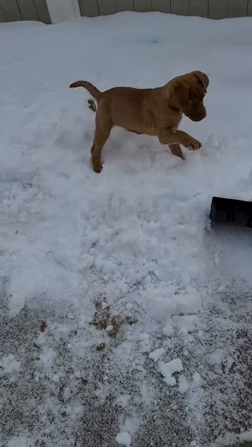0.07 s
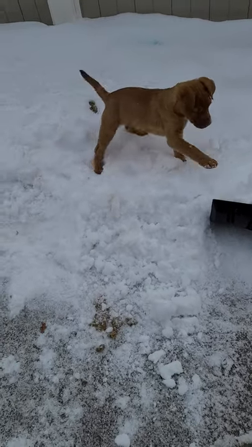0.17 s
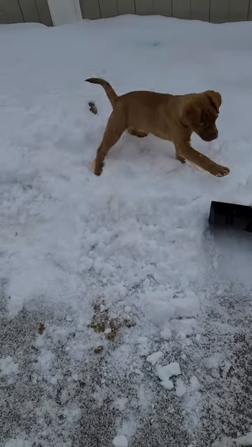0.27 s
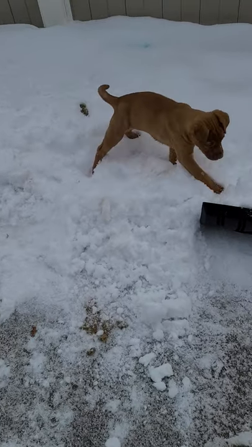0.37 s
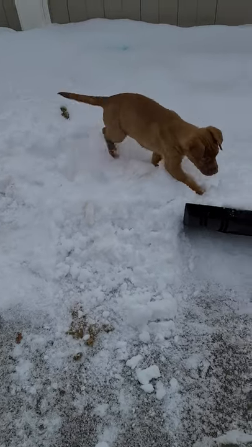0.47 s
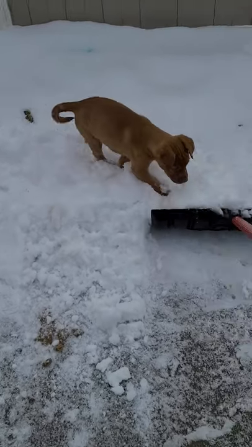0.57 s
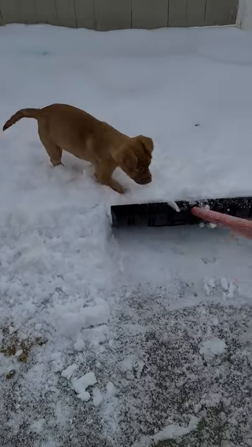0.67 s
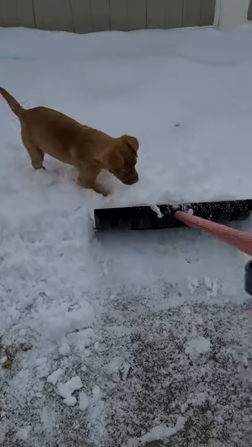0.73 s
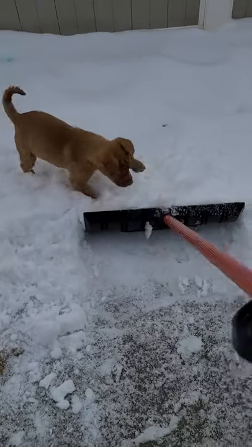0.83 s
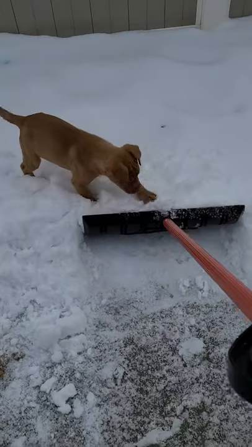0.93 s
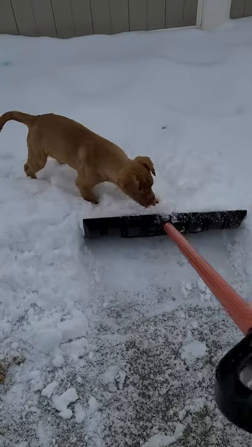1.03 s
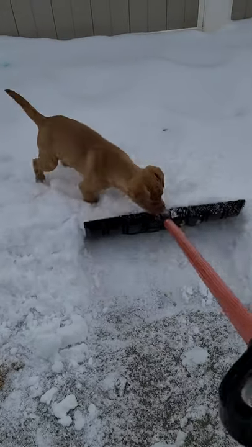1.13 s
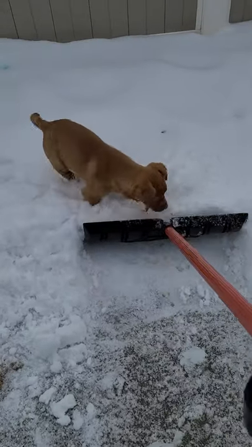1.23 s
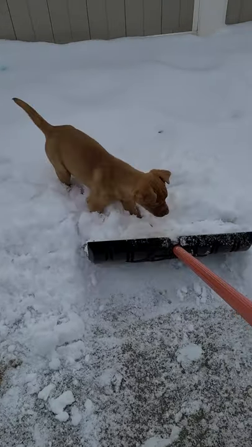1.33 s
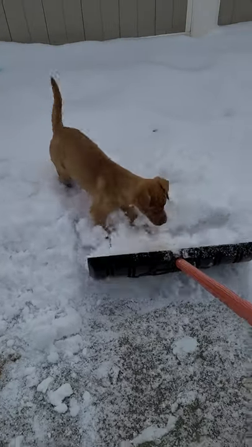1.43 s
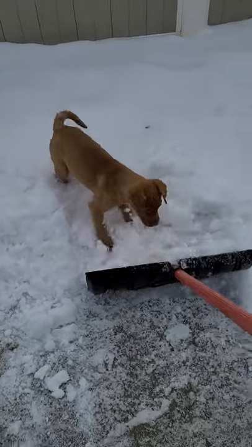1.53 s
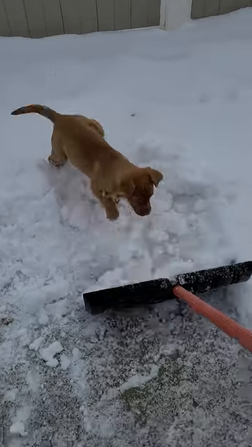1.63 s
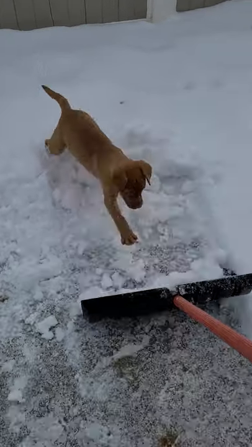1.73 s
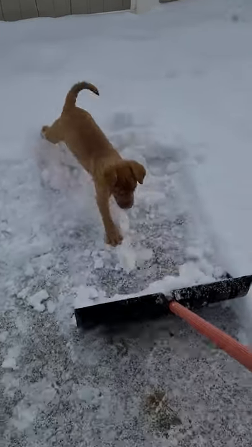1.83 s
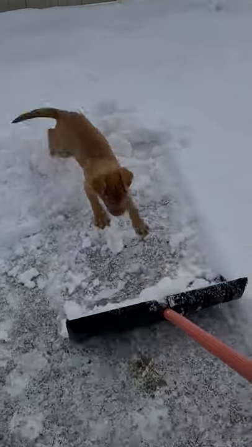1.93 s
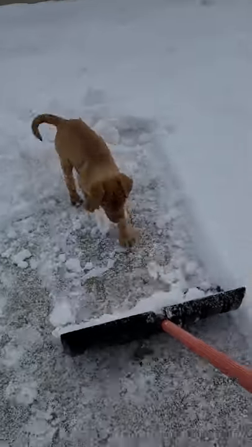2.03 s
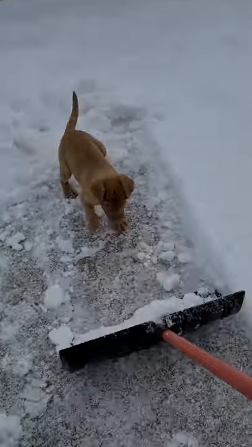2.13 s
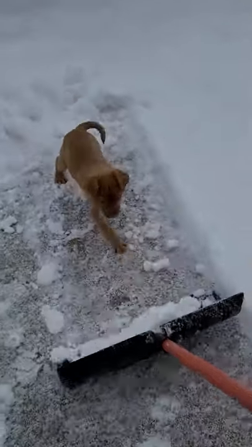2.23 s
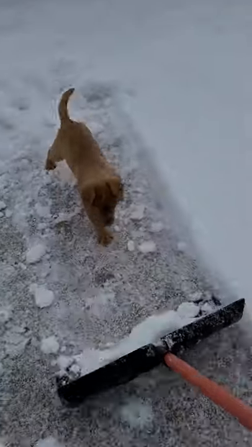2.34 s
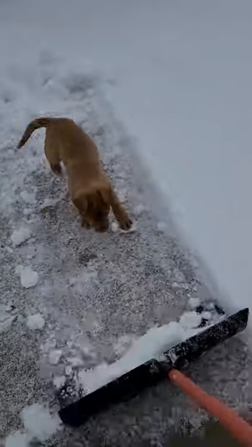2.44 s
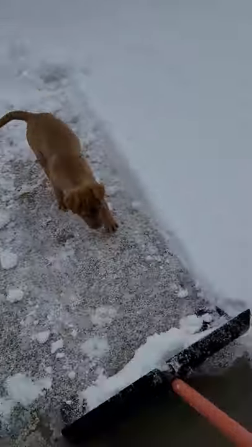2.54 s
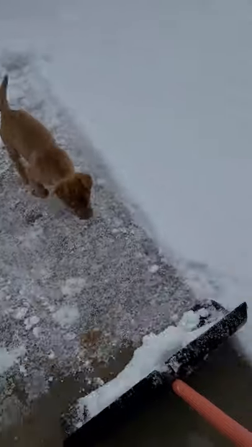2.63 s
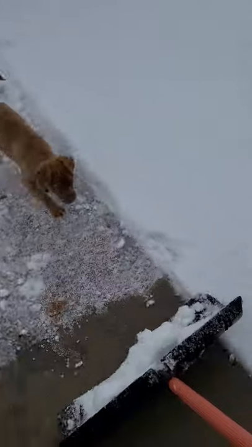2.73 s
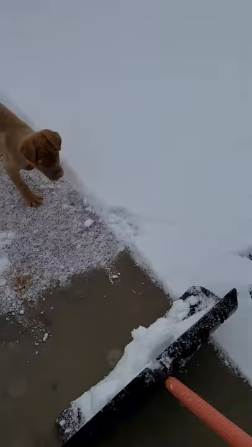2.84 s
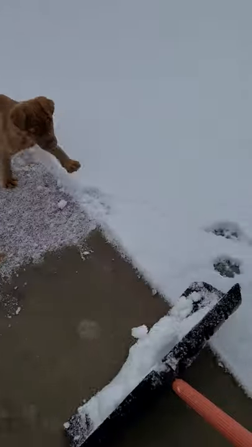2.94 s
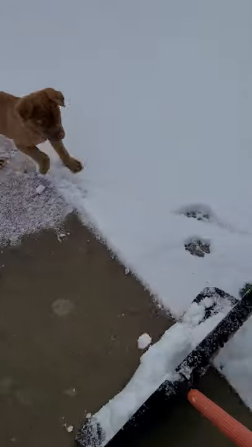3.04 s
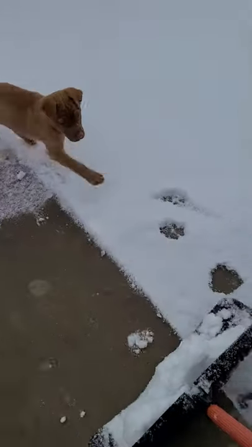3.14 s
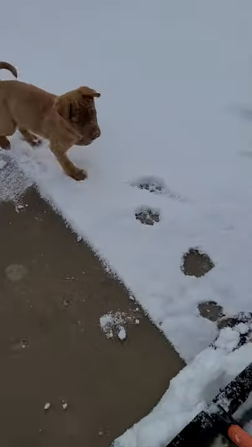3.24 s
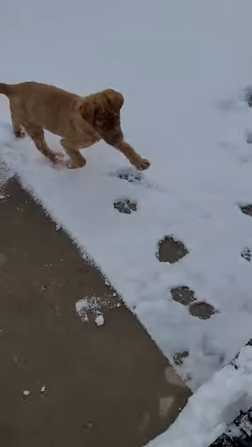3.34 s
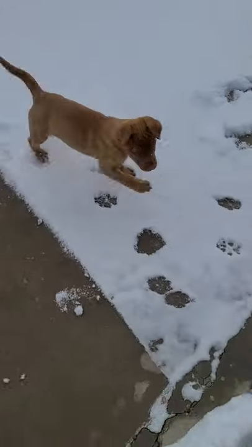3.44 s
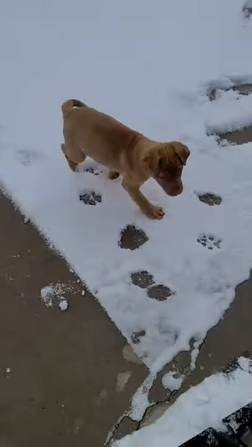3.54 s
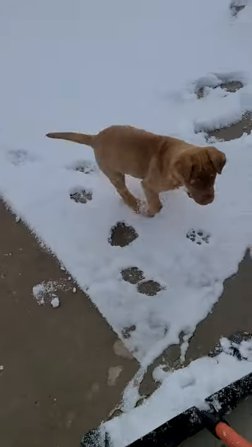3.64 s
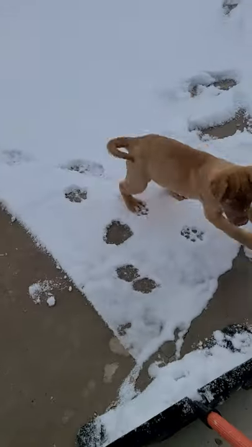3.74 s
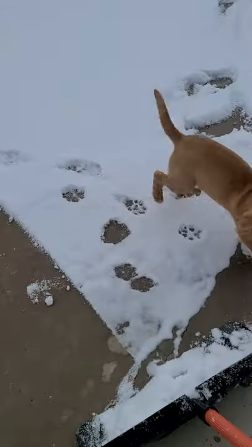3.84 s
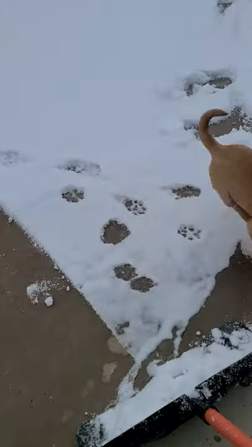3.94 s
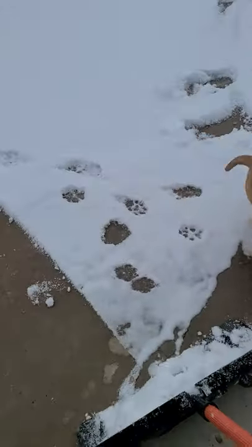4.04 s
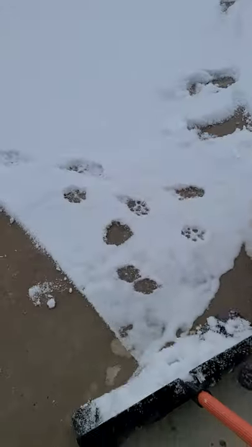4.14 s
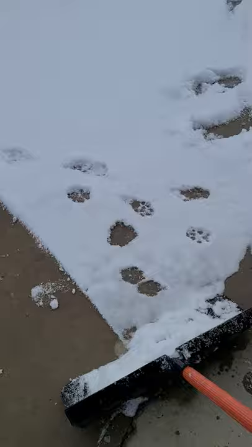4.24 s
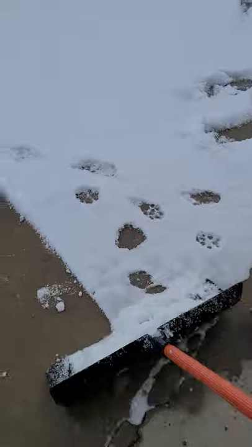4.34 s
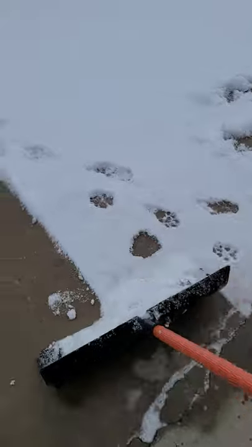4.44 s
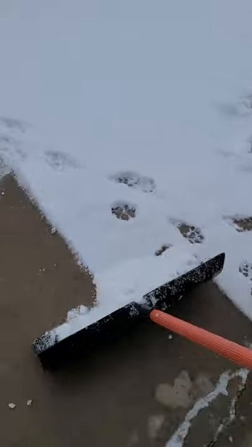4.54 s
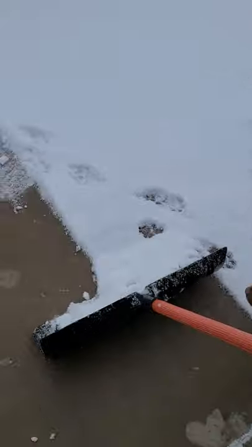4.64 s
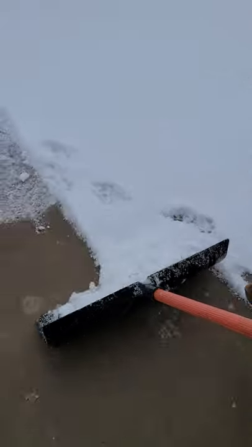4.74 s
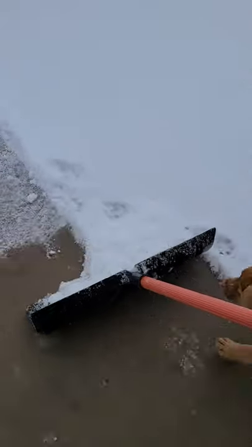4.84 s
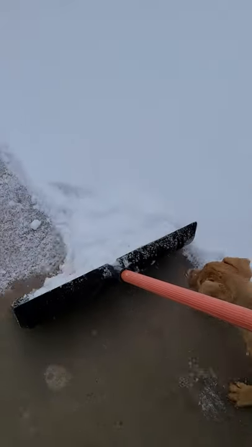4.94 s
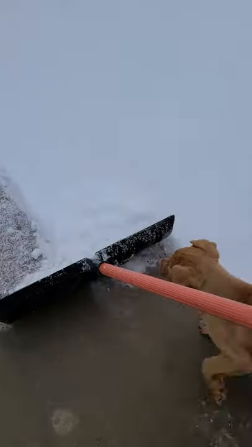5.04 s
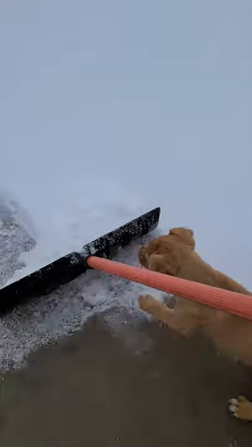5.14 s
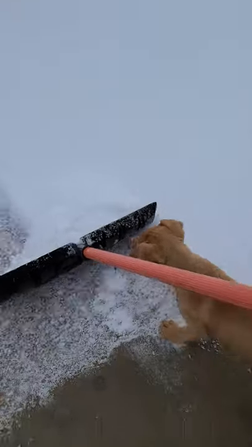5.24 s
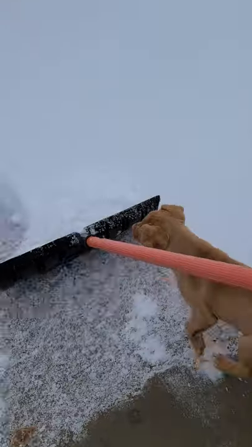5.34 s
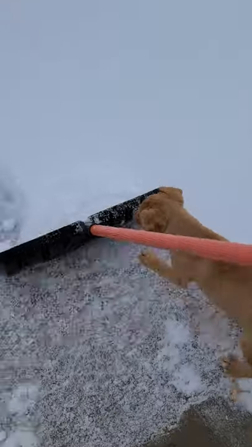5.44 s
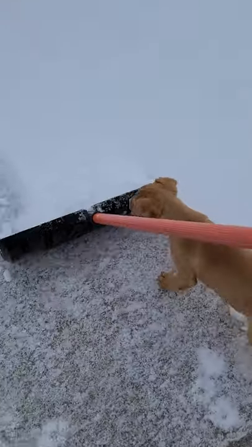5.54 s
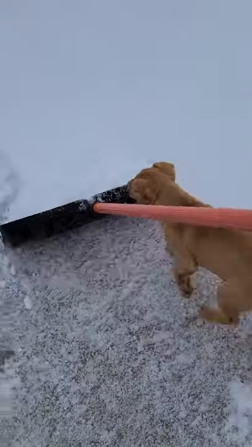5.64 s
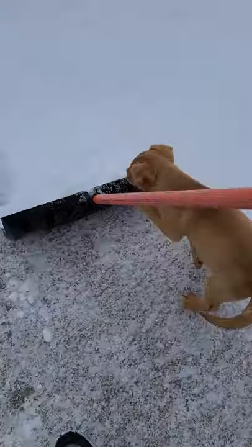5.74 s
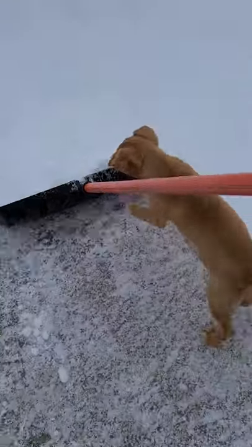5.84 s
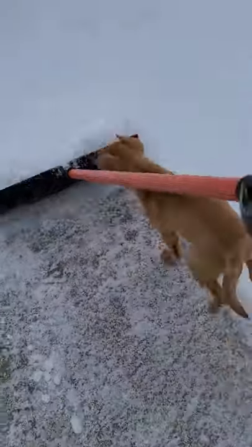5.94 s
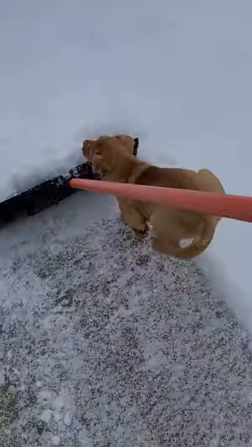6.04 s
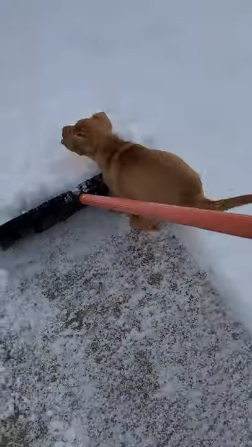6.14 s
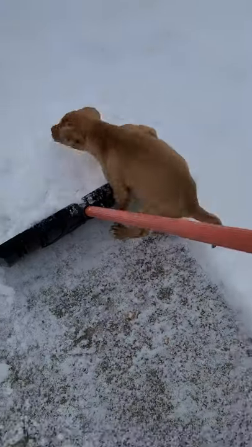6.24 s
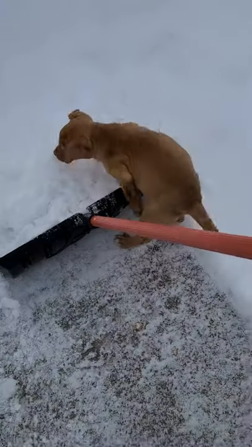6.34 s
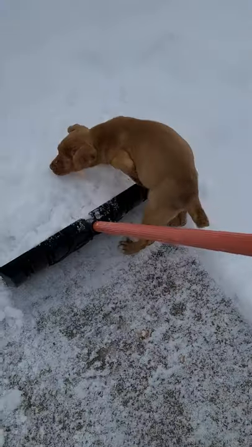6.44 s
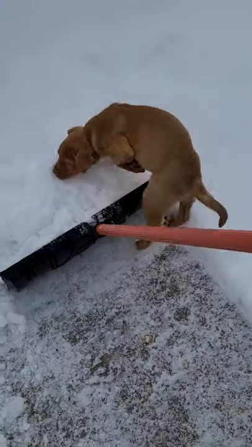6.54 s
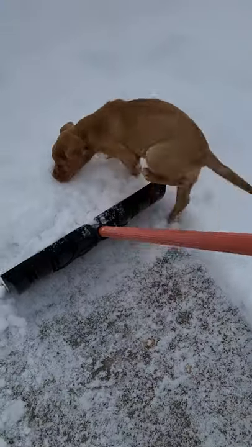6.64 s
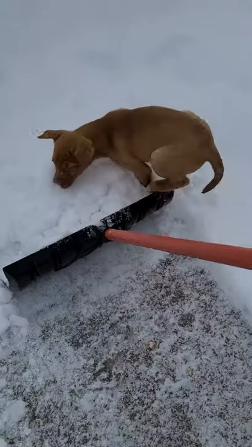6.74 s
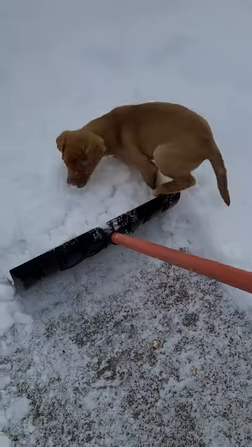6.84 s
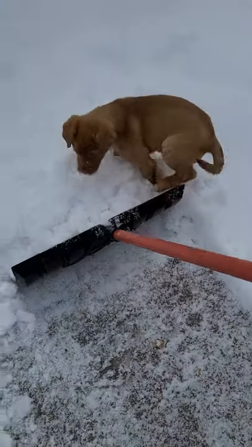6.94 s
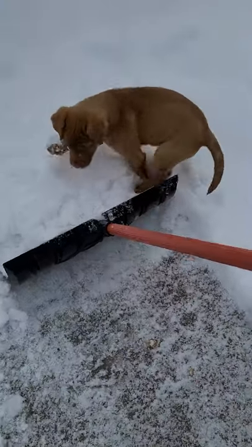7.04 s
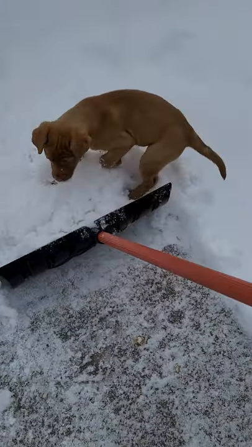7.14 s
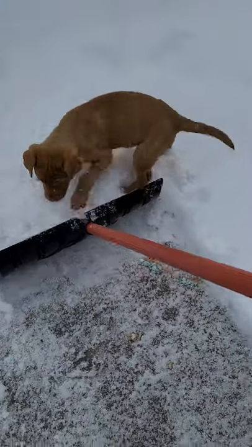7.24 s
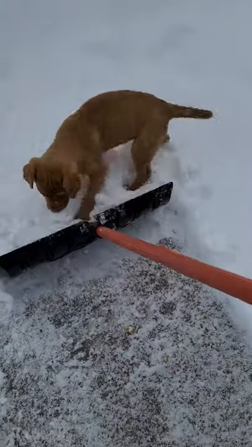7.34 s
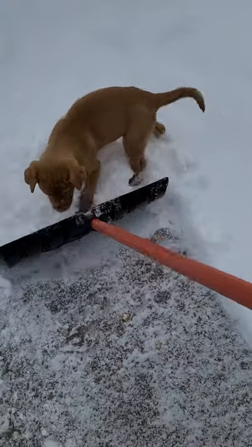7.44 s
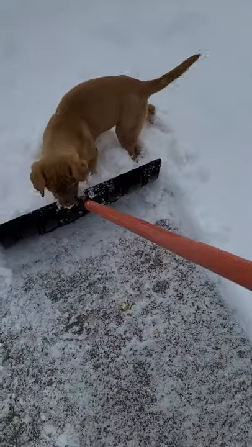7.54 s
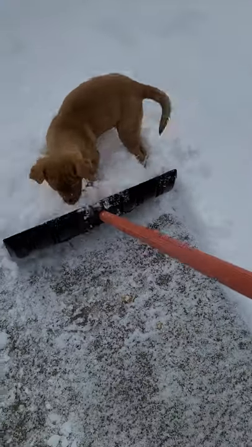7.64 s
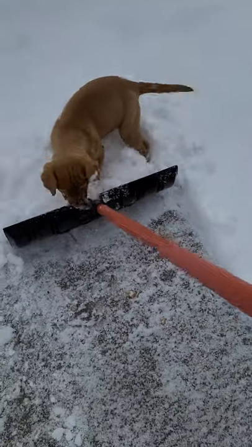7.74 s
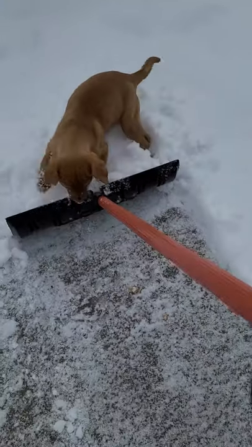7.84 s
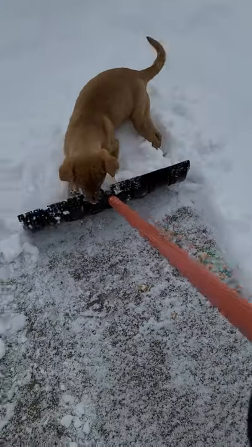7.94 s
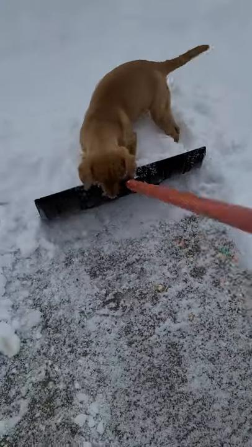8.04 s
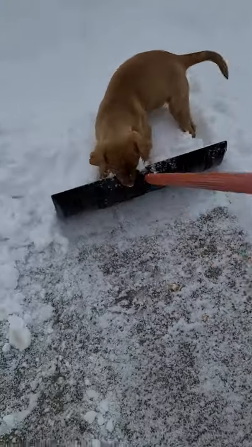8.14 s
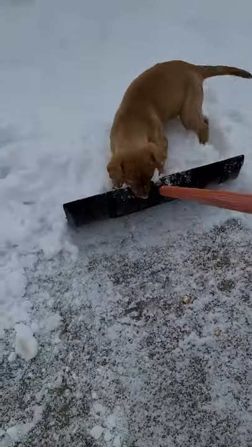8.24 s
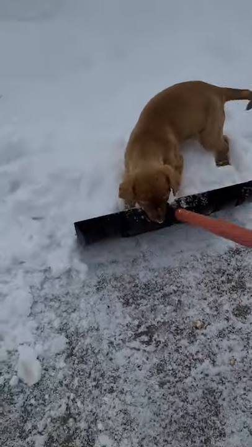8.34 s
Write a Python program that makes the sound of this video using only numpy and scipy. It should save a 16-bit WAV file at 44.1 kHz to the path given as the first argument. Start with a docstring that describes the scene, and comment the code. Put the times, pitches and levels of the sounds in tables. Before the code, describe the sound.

Close rough scraping of a plastic snow shovel on a snowy driveway, crackling and crunching, broken by clacks, dull thumps and faint wind.

```python
"""The edge of a wide plastic snow pusher scrapes over a driveway, close to a two-port microphone.
Friction is noise mixed with grit clicks, filtered by the blade; breaking crust swells it to a crunch.
Damped sines give the ticks and low thumps, and narrow noise a faint squeak; the blade's modes sing.
Low-passed noise in slow gusts is light wind at the ports, over a faint steady outdoor hush."""
import sys
import numpy as np
from scipy import signal
from scipy.fft import rfft, irfft
from scipy.io import wavfile
from scipy.ndimage import uniform_filter1d

SR = 44100
rng = np.random.default_rng(int(sys.argv[2]) if len(sys.argv) > 2 else 0)


def pcm_store(signal):
    """Save signal as 16-bit PCM."""
    levels = np.round(np.clip(np.atleast_2d(signal), -1, 1) * 32767)
    wavfile.write(sys.argv[1], SR, levels.astype(np.int16).T)


N = 370440  # samples

# Source levels of the shovel are relative: its whole mix is raised by SHOVEL_GAIN_DB.
SHOVEL_GAIN_DB = 5.0

# Ground under the edge: t/s, share of coarse grit (0-1)
GROUND_GRIT = [(1.5, 0.65), (2.57, 0.8), (2.64, 0.3), (4.9, 0.44), (5.0, 0.64), (6.1, 0.65)]
# Long strokes of the edge, one curve each: t/s, body level/dB
STROKE_CURVES = [
    [(1.63, -47.5), (1.68, -37), (2.2, -34.5), (2.34, -40), (2.58, -33.5), (2.68, -45), (3.15, -46.5),
     (3.2, -44), (3.42, -46), (3.5, -39.5), (3.7, -53), (3.95, -81)],
    [(4.0, -85), (4.04, -53), (4.27, -39.5), (4.85, -33), (4.92, -37), (5.03, -25), (5.15, -30.5),
     (5.66, -26.5), (6.0, -25.5), (6.057, -32), (6.064, -45), (6.2, -45), (6.3, -103)],
    [(6.3, -68), (6.72, -60), (6.85, -57.5), (7.0, -47.5), (7.3, -48), (7.55, -43.5), (7.68, -50.5),
     (8.4, -65)],
]
# Short light scuffs of the edge: middle t/s, peak body level/dB, half length/s
SCUFF_ARCHES = [(0, -45, 0.06), (0.675, -55.5, 0.27), (1.282, -41, .16), (1.49, -48, 0.097),
                (1.577, -37.5, 0.054), (7.121, -44.5, 0.054), (7.425, -32.5, 0.097), (7.788, -40.5, 0.083),
                (8.085, -46, 0.21)]
SCUFF_ENDS_DB = -23.5  # level re peak, one half length from the middle
# Colour of the slide: t/s, thud of the loaded blade re body/dB, hiss of the edge re body/dB
SLIDE_LOAD = [(0, 0.5, -6), (1.3, -5, -3.5), (2.0, -5, -9.5), (3.3, -6.5, 3.5), (3.6, -3.5, -7),
              (4.1, -6, 1.5), (5.1, -3.5, -3), (5.9, 1.5, -2.5), (6.3, -2.5, 1), (7.0, -2.5, -2.5),
              (8.4, -4, -5)]

# Response of the blade: f/Hz, relative level/dB
BLADE_SPECTRUM = [(59, -18.5), (100, -12.5), (239, 4), (406, 13.5), (1030, -0.5), (2470, -0.5),
                  (4570, -12.5), (8110, -20.5), (9410, -28), (12700, -24.5), (16000, -33.5)]
# Narrow ringing modes of the blade: f/Hz, width/Hz, lift/dB
MODES = [(592, 36, 1), (1200, 90, 6), (1840, 110, 3.5)]
SING_DB, GRIT_MUTES_DB = -5, -14  # modes driven by the slide; change for a full share of coarse grit
# Broad ring that shifts as the blade tilts and loads: t/s, f/Hz, lift/dB
MOVING_RING = [(.6, 2920, 4.5), (1.8, 3080, 6), (2.8, 3130, 4), (3.33, 4100, 5.5), (4.2, 3980, -2),
               (4.96, 2770, 6.5), (5.9, 3220, -1.5), (6.92, 2270, 11.5), (7.5, 2580, 6), (8.2, 2760, 8.5),
               (8.3, 1000, 8)]

# Bearing of the shovel: t/s, lag of the left port/samples
PORT_LAG = [(.2, -5), (1.2, 0), (1.7, 3), (3.2, 6), (4.2, 4), (5.2, -3), (8.2, -7)]
# Colour difference of the ports: f/Hz, left minus right level/dB
PORT_TILT = [(60, -4), (150, 0), (380, -5), (2380, -0.5), (5980, 2), (15000, 3)]
# Likeness of the ports: f/Hz, share of common signal (clipped to 0-1)
PORT_LIKENESS = [(150, 1), (600, 0.71), (2500, 0.57), (6000, 0.1)]

# Gusts: t/s, level before wander and port offsets/dB
WIND_LEVEL = [(1.5, -59.5), (2.58, -52), (2.7, -38.5), (3.05, -51.5), (3.25, -39.5), (3.6, -57.5),
              (5.9, -65.5), (7.1, -50.5), (7.7, -56.5)]
# Spectrum of the wind rumble: f/Hz, relative level/dB
WIND_SPECTRUM = [(20, -2), (65, 8.5), (110, -0.5), (220, -40.5), (700, -100)]
# Spectrum of the outdoor hush: f/Hz, relative level/dB
HUSH_SPECTRUM = [(65, -47), (110, -11.5), (4880, -30.5), (16000, -42)]
HUSH_GAIN_DB = -57.5

# Crust giving way: t/s, peak body level/dB, swell/s, hold/s, brightness/dB
CRUST_BREAKS = [(0.517, -34.5, 0.029, 0.049, 0), (1.032, -34, 0.035, 0.043, 0),
                (1.769, -35.5, .006, 0.031, -25), (1.834, -29.5, 0.012, 0.047, -5),
                (1.91, -31.5, 0.012, 0.019, -2), (1.956, -26.5, 0.031, 0.0031, -2.5),
                (2.05, -30.5, 0.0017, 0.046, -6), (2.273, -26, 0.01, 0.0013, -10),
                (2.296, -28.5, 0.0053, 0.005, 0), (2.359, -28.5, 0.0046, 0.042, -3.5),
                (2.449, -27.5, 0.0064, 0.036, -4), (2.534, -34, 0.0047, 0.052, 3),
                (3.429, -22.5, 0.023, 0.022, -1), (5.25, -30.5, 0.014, 0.011, 9),
                (5.305, -49, 0.0069, 0.0025, 9), (5.574, -23.5, 0.018, 0.027, 1.5),
                (5.678, -18, 0.015, 0.026, -3), (5.726, -18, 0.033, 0.015, 2.5),
                (5.791, -17.5, 0.0098, 0.033, 0.5), (5.833, -15.5, 0.023, 0.0053, -2.5),
                (5.866, -23.5, 0.0065, 0.084, 6.5), (6.149, -27, 0.019, 0.0076, 1.5),
                (6.833, -28, 0.096, 0.012, 4), (7.178, -25, 0.036, 0.014, 2.5),
                (7.307, -35, 0.039, 0.0034, 5.5), (7.422, -22, 0.06, 0.02, 3.5),
                (7.559, -34.5, 0.042, 0.042, 0), (7.945, -20, 0.057, 0.012, -1.5),
                (8.307, -40.5, 0.022, 0.064, -8)]
FALL_S, THUD_DB, HISS_DB = 0.014, -4.5, -3.5  # end of a crunch; thud and hiss re body at brightness 0
THUD_LOSS = 0.13  # dB of thud lost for each dB of brightness
# Loose snow settling after a crunch: level re its peak, slope, and hiss re body
TRICKLE_DB, TRICKLE_DB_PER_S, TRICKLE_HISS_DB = -13, -170, -5.5

# Blade drops or stops against the ground: t/s, level/dB, starting f/Hz
THUMP_BLOWS = [(0.565, -26.5, 293), (1.067, -25.5, 215), (3.456, -25, 302), (6.164, -21.5, 297),
               (6.915, -27.5, 208), (7.215, -27, 308), (7.498, -20, 359)]
THUMP_RISE_S, THUMP_CYCLES = 0.01, 5.3  # time constants of rise (s) and decay (cycles)
# Faint squeak as the edge slides on after a blow: t/s, length/s, level/dB, f/Hz
SQUEAK_NOTES = [(0.597, 0.24, -64, 2930), (8.048, .16, -49, 2970)]
# Single knocks and ticks on the blade: t/s, level/dB, f/Hz
TICK_BLOWS = [(0.659, -36.5, 1210), (1.666, -17, 1866), (1.705, -17.5, 1590), (1.787, -15.5, 890),
              (1.85, -17, 1123), (1.954, -18, 1220), (2.031, -24, 810), (2.048, -16, 1200),
              (2.091, -19, 960), (2.143, -18.5, 820), (2.372, -15.5, 1210), (2.479, -14, 1070),
              (2.573, -21, 1280), (3.188, -28, 483), (3.435, -19.5, 620), (3.451, -17, 2070),
              (3.46, -21, 1290), (3.531, -26, 980), (3.579, -30, 2920), (3.672, -32, 1500),
              (4.014, -37, 2500), (4.034, -33.5, 1770), (4.055, -30, 5030), (4.08, -28.5, 6750),
              (5.207, -9.5, 2880), (5.254, -13, 2580), (5.485, -10.5, 3520), (6.113, -16, 1565),
              (6.252, -31.5, 705), (6.384, -34.5, 11600), (6.623, -39, 7800), (6.75, -31, 2110),
              (6.769, -32.5, 6080), (6.787, -34, 2590), (6.928, -12, 382), (7.091, -22, 1226),
              (7.151, -36, 1305), (7.216, -4, 2134), (7.486, -10.5, 2220), (7.919, -31.5, 1080),
              (7.979, -18, 2390), (8.056, -21.5, 2170), (8.265, -32.5, 1250), (8.283, -25.5, 2640)]
TICK_CHIME_DB = -21  # modes rung by a tick, re its level

EDGE_HZ = 16050  # cutoff of the final low-pass


def gain_of(db):
    """Converts decibels to an amplitude ratio."""
    return 10 ** (np.asarray(db) / 20)


def evened(x):
    """Scales to unit rms, so that a level can be set afterwards."""
    return x / np.sqrt(np.mean(x ** 2) + 1e-20)


def read(points, hz):
    """Interpolates a spectrum table along a log-frequency axis."""
    f, value = np.transpose(points)
    return np.interp(np.log(hz + 1), np.log(f + 1), value)


def follow(rows):
    """Interpolates each column of a time table to one value a sample."""
    s, *columns = np.transpose(rows)
    t = np.arange(N) / SR
    return np.array([np.interp(t, s, column) for column in columns])


def add(mix, s, sound):
    """Superposes a sound on the mix from time s, in place."""
    part = mix[..., round(s * SR):][..., :sound.shape[-1]]
    part += sound[..., :part.shape[-1]]


def coloured(points):
    """Shapes white noise by a spectrum into stationary noise of unit rms."""
    hz = np.fft.rfftfreq(N, 1 / SR)
    white = rfft(rng.standard_normal(N))
    return evened(irfft(white * gain_of(read(points, hz)), N))


def wander(hz):
    """Low-passes noise at hz into a slow random fluctuation of unit rms."""
    lowpass = signal.butter(2, hz, fs=SR, output="sos")
    return evened(signal.sosfilt(lowpass, rng.standard_normal(N)))


def patches(hz, t, count, size=4):
    """Averages noise over frequency and time into smooth random fields of unit rms."""
    field = rng.standard_normal((len(t), len(hz), count)).T
    field = uniform_filter1d(field, size=size, axis=1)
    return evened(uniform_filter1d(field, size=45, axis=2))


def slide_level():
    """Incoherent sources add in power: strokes, scuffs and settling snow, for body, thud and hiss."""
    power, t = np.zeros((3, N)), np.arange(N) / SR
    # Doubled decibels turn gain_of into a power ratio
    for s, db in map(np.transpose, STROKE_CURVES):
        power += gain_of(2 * np.interp(t, s, db, -200, -200))
    for s, peak_db, half in SCUFF_ARCHES:
        arch_db = peak_db + SCUFF_ENDS_DB * ((t - s) / half) ** 2
        power += gain_of(2 * arch_db)
    for s, peak_db, swell, hold, _ in CRUST_BREAKS:
        settle_db = peak_db + TRICKLE_DB + TRICKLE_DB_PER_S * t[:SR // 2]
        bands_db = settle_db + np.array([[0], [0], [TRICKLE_HISS_DB]])
        add(power, s + swell + hold, gain_of(2 * bands_db))
    return np.sqrt(power)


def grains(per_s, spread_db):
    """Random impulses, a few much larger than the rest, in one train for each half of the edge."""
    size = gain_of(spread_db * np.minimum(rng.exponential(1, (2, N)), 3))
    sign = rng.choice([-1., 1.], (2, N))
    struck = rng.random((2, N)) < per_s / SR
    return evened(size * sign * struck)


def rubbing(grit, per_s, spread_db):
    """Friction shares its power between powder noise and grit impulses; the body holds the most grit."""
    share = np.clip(grit * np.array([1, .6, .5])[:, None, None], 0, 1)  # body, thud, hiss
    powder = np.sqrt(1 - share) * rng.standard_normal((2, N))
    return powder + np.sqrt(share) * grains(per_s, spread_db)


def sliding():
    """Wavering pressure modulates sliding friction, and more so over coarse ground."""
    thud_db, hiss_db = follow(SLIDE_LOAD)
    grit = follow(GROUND_GRIT)[0]
    chatter_db = grit * 3.9 * wander(100)
    colour_db = np.array([0 * grit, thud_db, hiss_db])
    level = slide_level() * gain_of(chatter_db + colour_db)
    return rubbing(grit, 800, 3.65) * level[:, None]


def blade_response():
    """Minimum phase makes the blade's responses causal: body, thud and hiss, each of unit energy."""
    hz = np.abs(np.fft.fftfreq(8192, 1 / SR))
    db = read(BLADE_SPECTRUM, hz)
    for f, width, lift_db in MODES:
        db = db + lift_db / (1 + (2 * (hz - f) / width) ** 2)
    low = 1 / (1 + (hz / 600) ** 4)
    high = 1 - 1 / (1 + (hz / 4000) ** 4)
    bands = np.sqrt([(1 - low) * (1 - high), low, high])
    logs = np.log(np.maximum(gain_of(db) * bands, 1e-5))
    # The Hilbert transform of the log magnitude supplies the minimum phase
    taps = np.fft.ifft(np.exp(np.conj(signal.hilbert(logs)))).real[:, :2048]
    return taps / np.linalg.norm(taps, axis=1, keepdims=True)


def chime(detune):
    """Free vibration: each mode of the blade decays at a rate set by its width."""
    t = np.arange(SR // 5) / SR
    out = np.zeros(len(t))
    for (f, width, lift_db), ratio in zip(MODES, detune):
        decay = np.exp(-np.pi * width * t)
        out += gain_of(lift_db) * decay * np.sin(2 * np.pi * f * ratio * t)
    return out


def singing():
    """Forced vibration: sliding noise keeps the modes sounding, and coarse ground mutes them."""
    ring = chime(np.ones(len(MODES)))
    ring /= np.linalg.norm(ring)
    drive_gain = gain_of(SING_DB + GRIT_MUTES_DB * follow(GROUND_GRIT)[0])
    drive = slide_level()[0] * drive_gain * rng.standard_normal((2, N))
    return signal.oaconvolve(drive, ring[None], axes=1)[:, :N]


def shifting_colour(hz, t):
    """A moving resonance, and colour that drifts as blade and hand move, partly apart at each port (dB)."""
    s, centre_hz, lift_db = np.transpose(MOVING_RING)
    detuning = (hz[:, None] - np.interp(t, s, centre_hz)) / 420
    ring_db = np.interp(t, s, lift_db) / (1 + detuning ** 2)
    both, *apart = patches(hz, t, count=3)
    bass_fade = np.tanh(hz / 600)[:, None]
    return ring_db + bass_fade * (1.6 * both + np.array(apart))


def ports(halves, blur):
    """Lag and colour separate the ports; toward the treble the right hears more of the other half edge."""
    hz, t, (a, b) = signal.stft(halves, SR, nperseg=512, noverlap=384)
    same = np.clip(read(PORT_LIKENESS, hz), 0, 1)[:, None]
    lag_samples = np.interp(t, *np.transpose(PORT_LAG))
    lag = np.exp(-2j * np.pi * np.outer(hz, lag_samples) / SR)
    # The wide edge blurs its bearing: a random phase in radians, least in the bass
    phase = blur * np.tanh(hz / 1500)[:, None] * patches(hz, t, count=1, size=16)[0]
    lag *= np.exp(1j * phase)
    tilt = gain_of(read(PORT_TILT, hz) / 2)[:, None]
    left = a * lag * tilt
    right = (same * a + np.sqrt(1 - same ** 2) * b) / tilt
    z = np.array([left, right]) * gain_of(shifting_colour(hz, t))
    return signal.istft(z, SR, nperseg=512, noverlap=384)[1][:, :N]


def wind():
    """Low-frequency noise in slow random gusts, mostly uncorrelated between the ports."""
    both = coloured(WIND_SPECTRUM)
    rumble = np.array([.5 * both + coloured(WIND_SPECTRUM) for _ in range(2)])
    port_db = np.array([[1], [-2.5]])  # left, right
    return rumble * gain_of(follow(WIND_LEVEL)[0] + 4 * wander(8) + port_db)


def hush():
    """Stationary noise, partly correlated between the ports."""
    apart = np.array([0.3 * coloured(HUSH_SPECTRUM) for _ in range(2)])
    return apart + 0.32 * coloured(HUSH_SPECTRUM)


def crunches():
    """Fracture of the crust gives dense impulses that swell, hold and stop short."""
    level = np.zeros((3, N))
    for s, peak_db, swell, hold, bright_db in CRUST_BREAKS:
        corners = np.cumsum([0, swell, hold, FALL_S])
        t = np.arange(0, corners[-1], 1 / SR)
        shape_db = np.interp(t, corners, [-17.5, 0.0, -2.0, -21.5])
        colour_db = np.array([[0], [THUD_DB - THUD_LOSS * bright_db], [HISS_DB + bright_db]])
        add(level, s, gain_of(shape_db + peak_db + colour_db))
    return level[:, None] * rubbing(0.97, 600, 2.47)


def thumps():
    """A damped low oscillation whose frequency wobbles and sags as it dies."""
    out, t = np.zeros(N), np.arange(SR // 5) / SR
    roughness = rng.standard_normal((len(THUMP_BLOWS), len(t)))
    for (s, level_db, hz), rough in zip(THUMP_BLOWS, roughness):
        wobble = 0.27 * evened(uniform_filter1d(rough, size=120))
        turns = np.cumsum(hz * (1 - 1.53 * t + wobble)) / SR
        envelope = (1 - np.exp(-t / THUMP_RISE_S)) * np.exp(-t * hz / THUMP_CYCLES)
        add(out, s, gain_of(level_db) * envelope * np.sin(2 * np.pi * turns))
    return out


def squeaks():
    """Slow noise modulates a sine into narrow-band noise around its pitch, fading gently."""
    out = np.zeros(N)
    for s, length, level_db, hz in SQUEAK_NOTES:
        t = np.arange(0, length, 1 / SR)
        smooth = uniform_filter1d(rng.standard_normal(SR), size=150)
        flutter = evened(uniform_filter1d(smooth, size=150))[:len(t)]
        envelope = gain_of(level_db - 6 * t / length) * np.sin(np.pi * t / length) ** .5
        add(out, s, envelope * flutter * np.sin(2 * np.pi * hz * t))
    return out


def ticks():
    """Impact gives a sharp noise edge, a damped ring, a rattle at its pitch and a touch of the modes."""
    out, t = np.zeros(N), np.arange(600) / SR
    edges = rng.standard_normal((len(TICK_BLOWS), len(t)))
    for (s, level_db, hz), edge in zip(TICK_BLOWS, edges):
        rough = evened(uniform_filter1d(edge[::-1], size=10))
        rattle = 0.76 * rough * t / 0.0021 * np.exp(-t / .002)
        decay = 0.51 * np.exp(-t * hz / 2.0)  # time constant of two cycles
        ring = np.sin(2 * np.pi * hz * t) * (decay + rattle)
        snap = 0.23 * uniform_filter1d(edge, size=3) * np.exp(-t / 0.0009)
        add(out, s, gain_of(level_db) * (ring + snap))
        add(out, s, gain_of(level_db + TICK_CHIME_DB) * chime(1 + 0.044 * edge[::-1]))
    return signal.lfilter(*signal.butter(2, 200, "high", fs=SR), out)  # the small blows push no bass


def scene():
    """Superposition: slide and crunch ring the blade; the other sources join in."""
    rubbed = sliding() + crunches()
    blade = signal.oaconvolve(rubbed, blade_response()[:, None], axes=2)[..., :N].sum(0)
    shovel = ports(blade + singing() + squeaks() + thumps(), blur=.8)
    shovel = shovel + ports(ticks() * np.array([[1], [.3]]), blur=0)  # mostly one half of the edge
    return gain_of(SHOVEL_GAIN_DB) * shovel + wind() + gain_of(HUSH_GAIN_DB) * hush()


def record(dry):
    """Clips at full scale, then limits the band with a linear-phase low-pass."""
    taps = signal.firwin(511, EDGE_HZ, window=("kaiser", 9), fs=SR)
    return signal.oaconvolve(np.clip(dry, -1, 1), taps[None], "same")


dry = scene()
out = record(dry)
pcm_store(out)
```